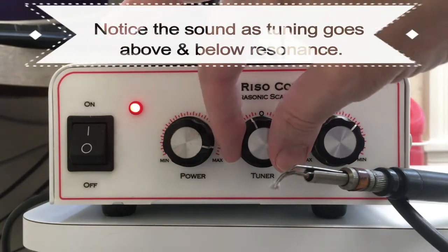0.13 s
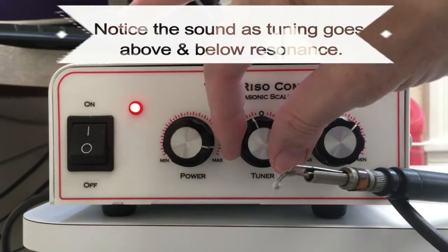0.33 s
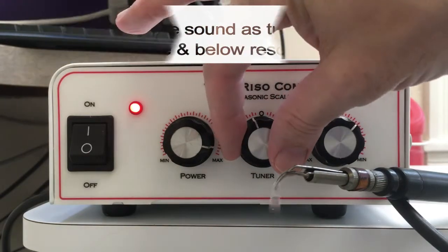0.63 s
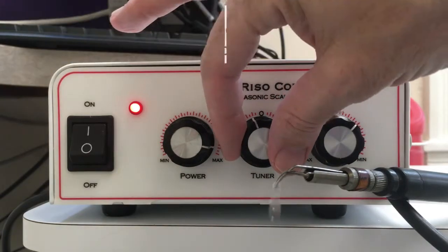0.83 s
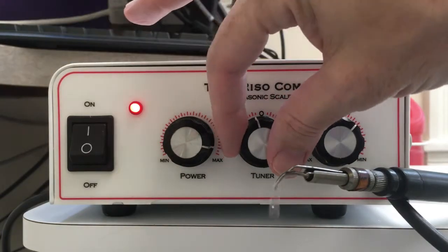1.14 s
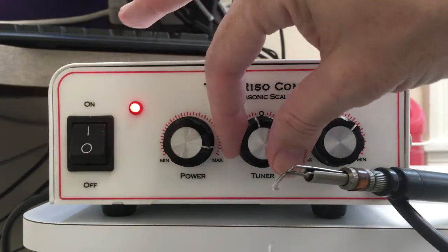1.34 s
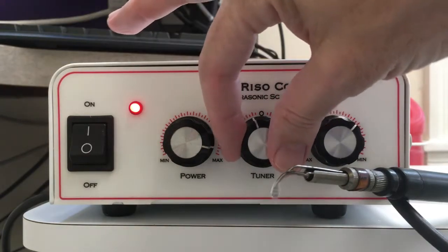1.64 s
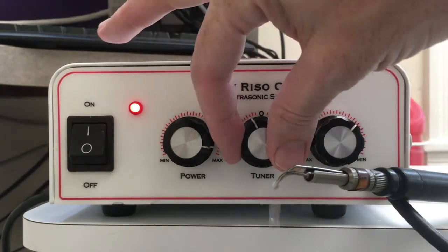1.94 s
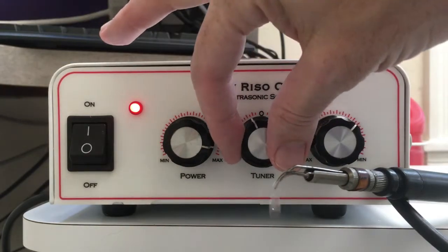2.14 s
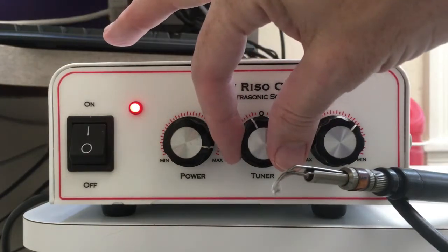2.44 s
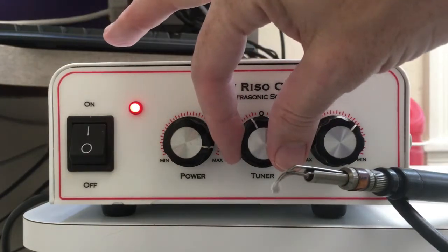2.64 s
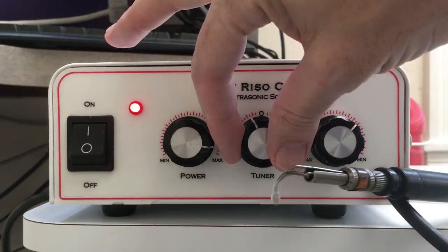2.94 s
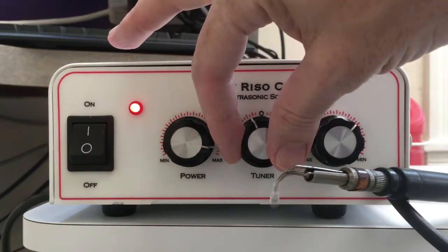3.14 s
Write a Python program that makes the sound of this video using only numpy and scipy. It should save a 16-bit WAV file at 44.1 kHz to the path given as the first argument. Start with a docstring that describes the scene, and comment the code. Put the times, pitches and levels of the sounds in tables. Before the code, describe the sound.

Thin, high whine of a dental scaler with sputtering water spray over faint room hum.

```python
"""A thin, piercing whine and a rough, fluttering ring in a hiss of spray: an ultrasonic dental scaler,
close up. Its vibrating tip sings the whine; droplets and collapsing bubbles keep it ringing, and the
water on it spits and sizzles. A hand turns the tuning knob, and about a second in the sound sinks off
resonance, then returns. The knob ticks faintly over the low hum of a room."""
import sys
import numpy as np
from scipy import signal
from scipy.fft import rfft, irfft, next_fast_len
from scipy.io import wavfile
from scipy.ndimage import uniform_filter1d, map_coordinates

SR = 44100
rng = np.random.default_rng(int(sys.argv[2]) if len(sys.argv) > 2 else 0)


def unload_audio(sound):
    """Save the sound as a 16-bit wav file, at the path given as the first command line argument."""
    columns = np.transpose(np.atleast_2d(sound))
    # keep every value between -1 and 1, then stretch to whole-number steps
    steps = np.round(np.clip(columns, -1, 1) * 32767)
    wavfile.write(sys.argv[1], SR, steps.astype(np.int16))


N = 145530


def amp(db):
    """Decibels to gain."""
    return 10 ** (np.asarray(db) / 20)


def unit(x):
    """Scale to rms 1."""
    return x / np.sqrt(np.mean(x ** 2) + 1e-20)


def clock():
    """Time of each sample in seconds."""
    return np.arange(N) / SR


def curve(rows):
    """An automation lane: (t/s, value) points joined by straight lines."""
    return np.interp(clock(), *np.transpose(rows))


def spells(rows, fade_s):
    """A soft-edged gate from rows of start/s, end/s, level/dB."""
    t = clock()
    edge = lambda u: np.clip(.5 + u / (2 * fade_s), 0, 1)
    return sum(amp(db) * edge(t - a) * edge(b - t) for a, b, db in rows)


def wobble(rate):
    """A smooth random modulator, rate knots a second."""
    return map_coordinates(rng.standard_normal(4096), [clock() * rate + 2], mode="wrap")


def filtered(x, response):
    """Filter x with a gain given as a function of frequency."""
    m = next_fast_len(N + 8192)
    return irfft(rfft(x, m) * response(np.fft.rfftfreq(m, 1 / SR)), m)[:N]


def coloured(x, points):
    """x through an EQ of (f/Hz, level/dB) points, at rms 1."""
    f, db = np.transpose(points)
    return unit(filtered(x, lambda hz: amp(np.interp(np.log(hz + 1), np.log(f), db))))


def noise(points):
    """White noise through an EQ."""
    return coloured(rng.standard_normal(N), points)


def room():
    """The bed: faint air noise and the wavering hum of appliances."""
    air_eq = [(20, -7), (40, 3), (60, -5), (85, 7.5), (105, -0.5), (135, -7), (200, -3.5), (290, -6.5),
              (420, -12), (900, -17.5), (1700, -22.5), (3000, -20), (5000, -21), (16000, -27.5)]  # room tone: f/Hz, level/dB
    hum_lines = [(105, -68, 5.5), (119.6, -69, 1), (194.7, -67, 2.5), (214, -77.5, 3), (332, -78.5, 1.5)]  # constant hum partials: f/Hz, level/dB, waver/dB
    deep_fader = [(0.0, -75), (0.16, -56), (0.48, -55.5), (0.57, -68), (0.93, -58), (0.96, -86),
                  (1.11, -54.5), (1.21, -67.5), (2.2, -59), (2.29, -50.5), (2.46, -62), (3.3, -65)]  # swells of the deepest hum: t/s, relative level/dB
    drone_fader = [(0.0, -84), (0.14, -63.5), (0.22, -83), (1.64, -71), (1.72, -82), (1.78, -62.5),
                   (2.12, -75), (3.01, -66), (3.16, -59), (3.3, -76)]  # swells of a droning partial: t/s, relative level/dB
    tone = lambda hz: unit(np.sin(2 * np.pi * hz * clock() + .5 * wobble(4.7)))
    hum = sum(amp(db + waver_db * wobble(5.26)) * tone(hz) for hz, db, waver_db in hum_lines)
    deep = amp(curve(deep_fader) + 2.5) * tone(hz=55.2)
    drone = amp(curve(drone_fader) + .5) * tone(hz=257.3)
    return deep + drone + hum + amp(-58) * noise(air_eq)


def knob(tick_t60_s=.04, tail_t60_s=.3, tail_db=-15, grain_db=1.5):
    """Soft rubs of the fingers and small ticks of the turning knob, each with a faint tail."""
    ticks = [(0.71, -66, -56.5), (.889, -59.5, -66), (1.228, -58, -60), (1.687, -64, -56.5),
             (1.845, -63.5, -62), (2.114, -47.5, -64), (2.317, -67, -57.5), (2.729, -63, -65),
             (3.167, -63, -64)]  # knob ticks: t/s, body level/dB, snap level/dB
    body_eq = [(200, -25), (480, -15), (620, 2), (930, 0), (1150, -12), (3000, -28)]  # a tick's midrange knock: f/Hz, level/dB
    snap_eq = [(400, 4), (1400, -2.5), (3000, 2.5), (5000, -5), (9000, -61)]  # its brighter snap: f/Hz, level/dB
    rubs = [(.16, 0.1, -64.5), (1.272, 0.046, -61), (1.407, 0.049, -55.5), (1.55, 0.042, -57.5)]  # finger strokes: centre t/s, half length/s, level/dB
    rub_eq = [(60, -3), (100, 10.5), (180, 3.5), (300, 8), (400, -7.5), (520, 3), (640, -4), (780, 0.5),
              (880, -12), (1000, 2.5), (1200, -7.5), (1600, -11), (5000, -18.5)]  # skin on the knob: f/Hz, level/dB
    t = clock()
    body, snap = noise(body_eq), noise(snap_eq)
    strokes = sum(amp(db) * np.exp(-.5 * ((t - centre) / half) ** 2) for centre, half, db in rubs)
    handling = strokes * unit(noise(rub_eq) * amp(grain_db * wobble(38.6)))
    for start, body_db, snap_db in ticks:
        age = np.maximum(t - start, 0)
        decay = amp(-60 * age / tick_t60_s) + amp(tail_db - 60 * age / tail_t60_s)
        handling += (t >= start) * decay * (amp(body_db) * body + amp(snap_db) * snap)
    return handling


def bursts(per_s, spread_db):
    """A dense stream of tiny bubble collapses of uneven size."""
    collapses = (rng.random(N) < per_s / SR) * rng.standard_normal(N)
    return unit(collapses * amp(spread_db * rng.standard_normal(N)))


def spits(per_s=70, decay_s=.004, depth=.8):
    """Envelope of droplets hitting the tip at random: each lifts the level at once and dies away."""
    hits = (rng.random(N) < per_s / SR) * rng.random(N)
    return unit(1 + depth * signal.lfilter([1], [1, -np.exp(-1 / (decay_s * SR))], hits))


def ripple(depth, rate_hz=120):
    """Tremolo of the drive, which swells with every half cycle of the mains."""
    return 1 + depth * np.sin(2 * np.pi * rate_hz * clock())


def mist(sputter):
    """Fine mist off the tip makes a continuous, airy hiss."""
    fader = [(0.0, -31), (0.12, -32), (0.17, -35.5), (0.26, -30.5), (0.36, -36), (0.56, -33), (0.65, -27),
             (0.73, -33.5), (0.88, -37), (1.04, -34), (1.18, -39.5), (1.42, -31.5), (1.44, -32), (1.5, -31),
             (1.67, -30), (1.73, -34), (2.17, -34), (2.21, -28), (2.32, -33), (2.55, -30), (2.64, -33),
             (2.87, -31), (2.89, -33.5), (3.3, -33)]  # ride of the hiss: t/s, relative level/dB
    eq = [(5000, -48), (7600, -30), (8300, -18), (8600, -17.5), (8900, -8), (9250, -10), (9700, -5.5),
          (10500, -9), (11200, -2), (12000, 0.5), (12700, 8.5), (13400, -1.5), (14600, 2.5), (15200, -7.5),
          (15700, -5.5)]  # tone of the hiss: f/Hz, level/dB
    return amp(curve(fader) + 3.5) * coloured(sputter * bursts(15000, spread_db=.5), eq)


def surges(sputter, pivot_hz=12400):
    """Water gushes over the tip in short swells of hiss, each with its own brightness."""
    cues = [(-.02, 0.16, -24, 2), (0.25, .29, -22.5, -1), (0.584, 0.706, -34, 0), (1.01, 1.102, -28, 1.5),
            (1.38, 1.417, -48, 2), (1.488, 1.69, -27.5, 4), (2.157, 2.28, -26, -1.5),
            (2.428, 2.566, -27, -0.5), (2.798, 2.857, -18.5, 4), (2.93, 3.202, -27.5, 4)]  # gushes: start/s, end/s, level/dB, tilt/(dB per kHz)
    eq = [(5000, -54.5), (7800, -34), (8900, -17.5), (10400, -16), (11100, -1.5), (11900, 7), (12900, 7),
          (13800, -11.5), (15700, -36)]  # tone of a gush before its tilt: f/Hz, level/dB
    gush = sputter * bursts(9000, spread_db=1.0)
    tilted = lambda tilt: [(hz, db + tilt * (hz - pivot_hz) / 1000) for hz, db in eq]
    return sum(spells([(start, end, db)], fade_s=.02) * coloured(gush, tilted(tilt))
               for start, end, db, tilt in cues)


def sizzle(sputter):
    """Cavitation crackles in the water and shakes a faint ringing out of the handpiece."""
    fader = [(0.0, -31.5), (0.01, -77), (0.13, -58), (0.24, -48.5), (0.49, -57), (0.97, -54.5),
             (1.01, -62.5), (1.13, -71), (1.58, -61.5), (1.64, -63), (1.73, -52.5), (2.1, -52),
             (2.27, -57.5), (2.3, -52), (2.79, -51), (2.82, -53.5), (3.08, -50.5), (3.3, -54.5)]  # ride of the cavitation: t/s, relative level/dB
    fizz_eq = [(4000, -33), (4950, -28), (5300, -6), (5900, -5), (6500, 4), (7100, -3.5), (7500, 0.5),
               (7850, -2), (8300, 3), (8900, 3.5), (10000, -9), (15000, -3.5)]  # tone of the cavitation: f/Hz, level/dB
    handpiece_eq = [(2200, -15.5), (2450, -8), (2750, -23), (3100, -20), (3300, 2.5), (3500, -23.5),
                    (4200, -17.5)]  # handpiece resonances: f/Hz, level/dB
    crackle = sputter * amp(1.27 * wobble(130)) * bursts(9000, spread_db=.5)
    fizz = amp(5) * coloured(crackle, fizz_eq)
    handpiece = amp(-19.5 + 3.2 * wobble(12)) * coloured(crackle, handpiece_eq)
    return amp(curve(fader)) * (fizz + handpiece)


def spray():
    """The three water layers sputter together, pulsed by the drive."""
    sputter = unit(spits() * amp(1.1 * wobble(350))) * ripple(depth=.13)
    return mist(sputter) + surges(sputter) + sizzle(sputter)


def echoed(x, desk_s=.004, desk_db=-19, room_t60_s=.2, room_db=-15):
    """Quick reflections off the desk and case, then a short tail of the room."""
    t = np.arange(SR // 4) / SR
    early = rng.standard_normal(len(t)) * (t > desk_s / 10) * amp(-20 * t / desk_s)
    tail = rng.standard_normal(len(t)) * amp(-60 * t / room_t60_s)
    impulse = (t == 0) + amp(desk_db) * early / np.linalg.norm(early)
    impulse += amp(room_db) * tail / np.linalg.norm(tail)
    return signal.fftconvolve(x, impulse / np.linalg.norm(impulse))[:N]


def ring(skirt_hz=366, flutter_db=1.3):
    """Bubbles and droplets ring the tip's narrow resonances, which beat against the whine."""
    modes = [(12475, 42, 0), (12405, 80, -8), (12225, 110, -8.5)]  # resonances of the wet tip: f/Hz, width/Hz, relative level/dB
    fader = [(0.0, -41), (0.07, -23.5), (0.1, -34), (0.16, -19.5), (0.44, -21.5), (0.45, -17.5),
             (0.55, -23), (0.6, -19), (0.65, -28), (0.68, -16), (0.71, -22), (0.81, -22.5), (0.84, -18),
             (0.94, -28), (0.96, -18.5), (1.08, -33.5), (1.13, -44), (1.17, -27.5), (1.26, -46.5),
             (1.3, -61), (1.35, -29.5), (1.42, -38.5), (1.61, -24.5), (1.65, -29), (1.71, -19.5),
             (1.8, -22.5), (1.84, -19), (1.94, -23.5), (2.05, -20.5), (2.23, -21.5), (2.25, -16),
             (2.29, -22), (2.52, -18.5), (2.56, -26.5), (3.08, -21.5), (3.3, -27)]  # ride of the rough ring: t/s, relative level/dB
    droplets = spits()

    def mode(centre, width):
        peak = lambda f: 1j * f * width / (centre ** 2 - f ** 2 + 1j * f * width)
        response = lambda f: peak(f) / (1 + 1j * (f - centre) / skirt_hz) ** 2  # steeper skirts
        return unit(filtered(droplets * bursts(2500, spread_db=3.5), response))

    tip = sum(amp(db) * mode(hz, width) for hz, width, db in modes)
    power = np.abs(uniform_filter1d(tip ** 2, size=1600))
    levelled = tip / np.sqrt(power + 1e-9)  # the ringing limits its own level
    return amp(curve(fader) + 3) * unit(levelled * amp(flutter_db * wobble(35.29)))


def whine(wander_hz=3.6, jitter_rad=.3, flutter_db=1.8):
    """The tip's clean tone, likely half the ultrasonic drive frequency, catches and lets go."""
    pitch = [(.14, 12220), (.2, 12250), (.3, 12265), (.38, 12283), (.57, 12288), (1.0, 12280), (1.7, 12280),
             (2.05, 12262), (2.35, 12272), (2.6, 12272), (2.95, 12263), (3.3, 12264)]  # pitch of the whine: t/s, f/Hz
    holds = [(.15, .33, -25.5), (.34, .58, -22), (.73, .99, -27.5), (1.68, 1.76, -20.5),
             (1.88, 2.17, -23.5), (2.32, 2.53, -22.5), (2.55, 2.7, -20), (2.72, 2.8, -17),
             (2.85, 3.35, -18)]  # spells when the tip holds the tone: start/s, end/s, level/dB
    hz = curve(pitch) + wander_hz * wobble(16)
    phase = 2 * np.pi * np.cumsum(hz) / SR + jitter_rad * wobble(84)
    return spells(holds, fade_s=.018) * unit(np.sin(phase) * amp(flutter_db * wobble(40)))


def scene():
    """The mono mix at one close microphone, with reflections on the spray alone."""
    return (whine() + ring() + echoed(spray()) + knob() + room())[None]


def record(dry, fade_s=.004, top_hz=15780):
    """Quick fades at both ends and a brick-wall high cut."""
    t = clock()
    fades = np.sin(np.pi / 2 * np.clip(np.minimum(t, t[-1] - t) / fade_s, 0, 1)) ** 2
    return np.array([filtered(channel * fades, lambda hz: hz < top_hz) for channel in dry])


dry = scene()
out = record(dry)
unload_audio(out)
```